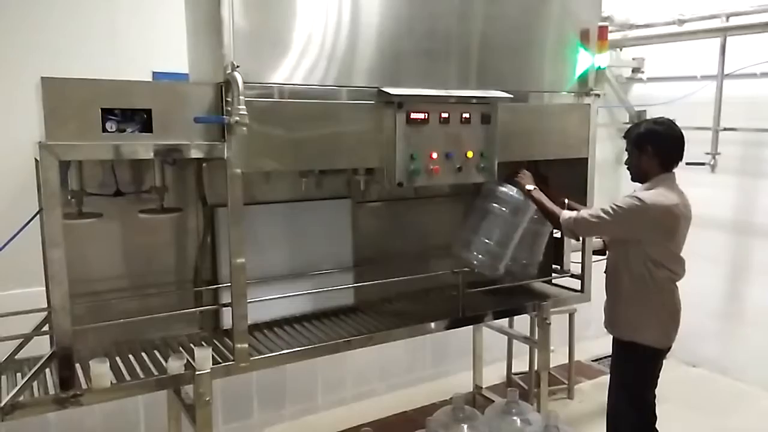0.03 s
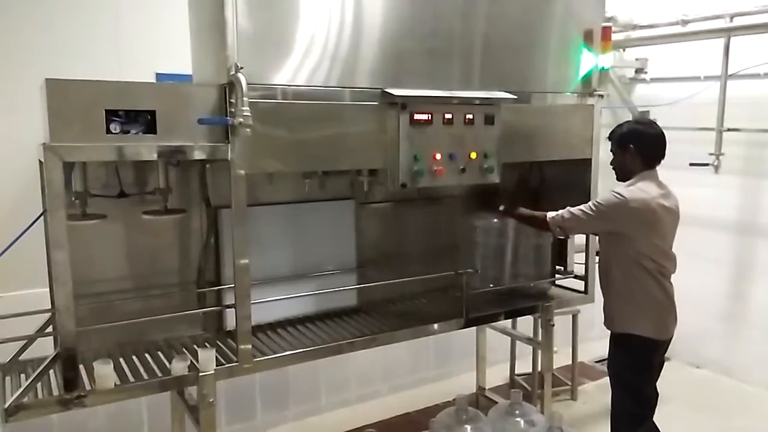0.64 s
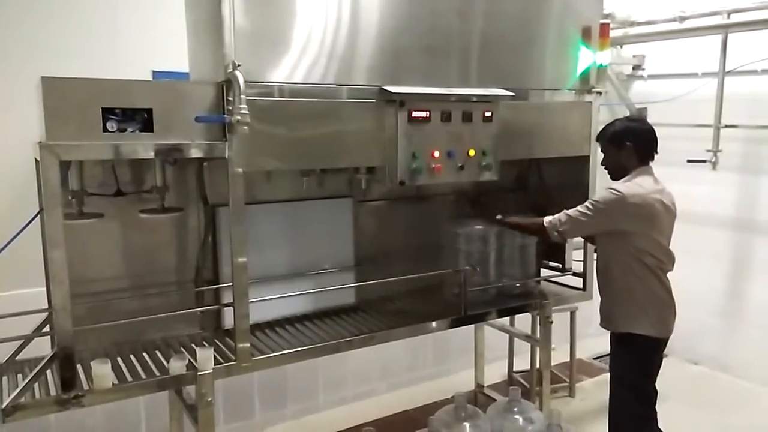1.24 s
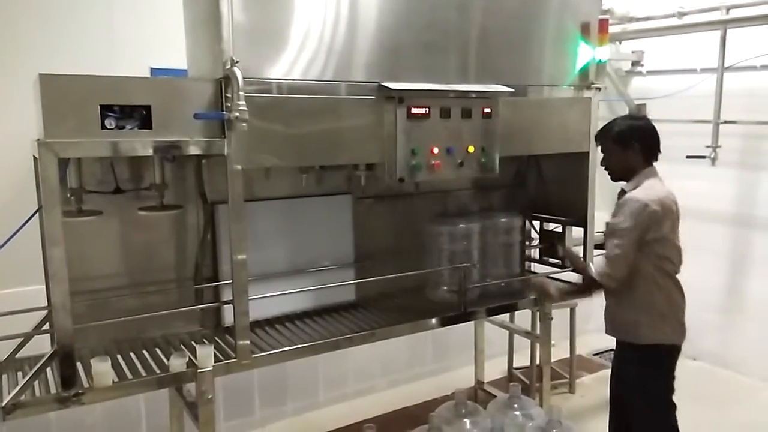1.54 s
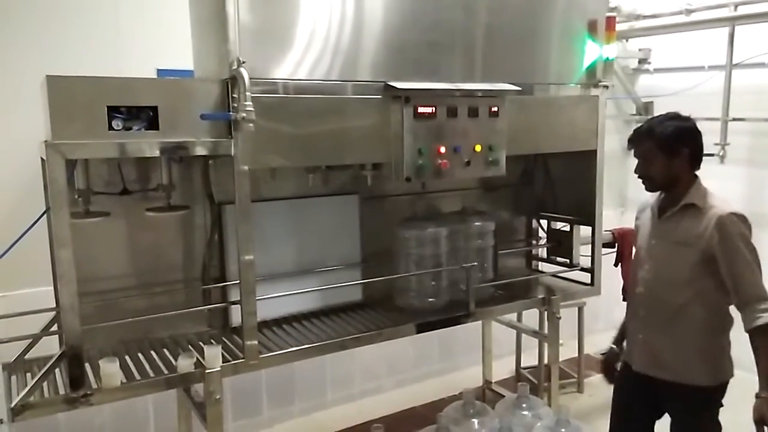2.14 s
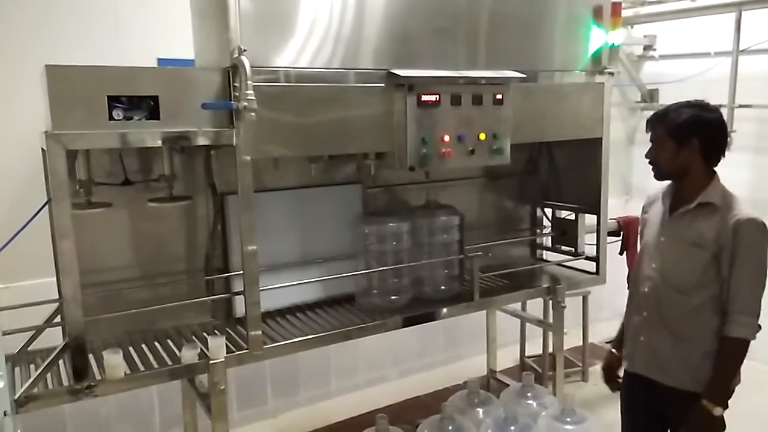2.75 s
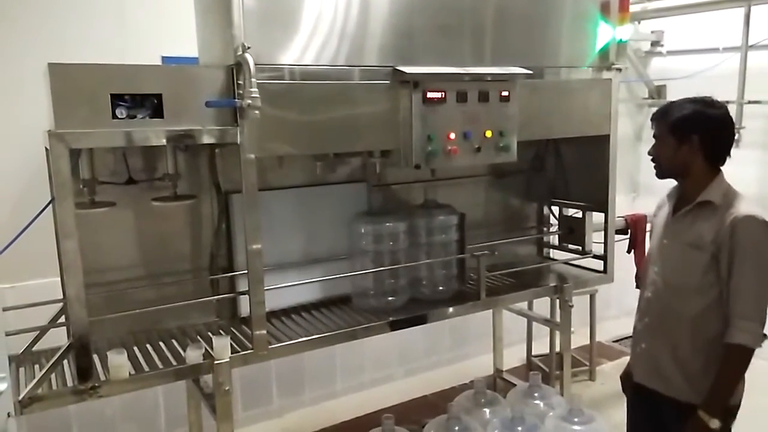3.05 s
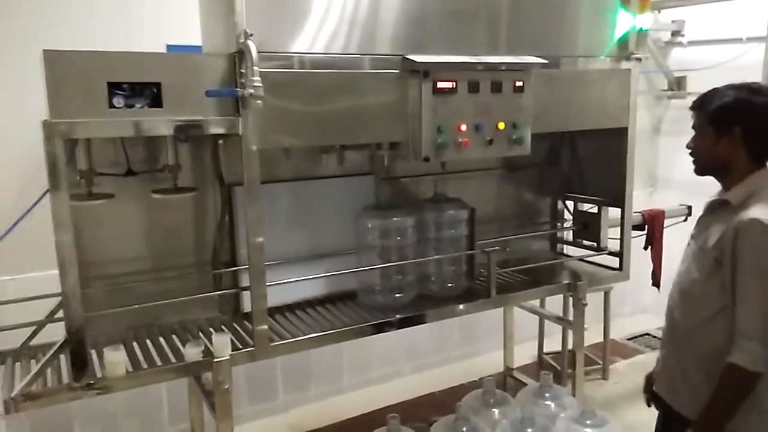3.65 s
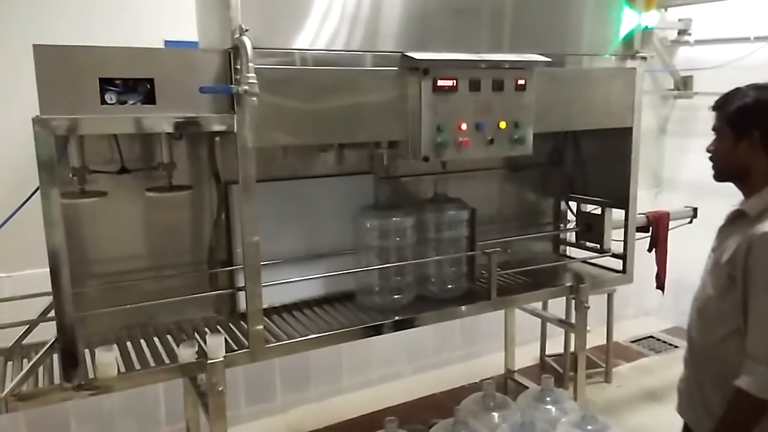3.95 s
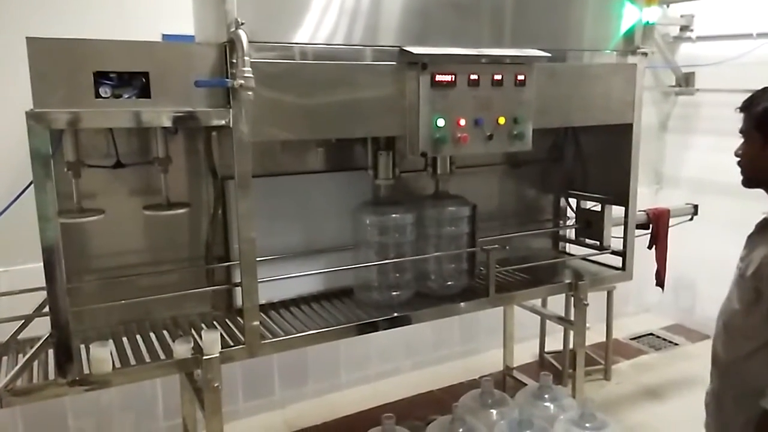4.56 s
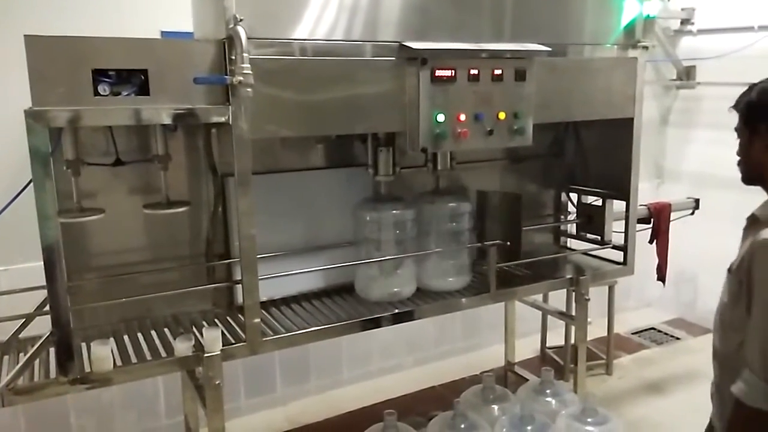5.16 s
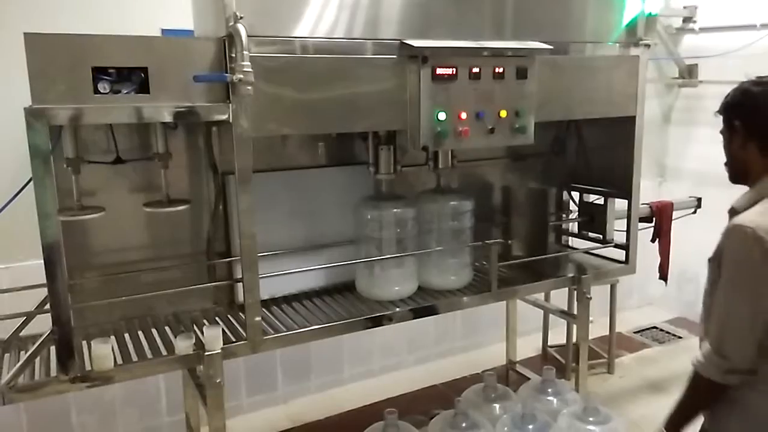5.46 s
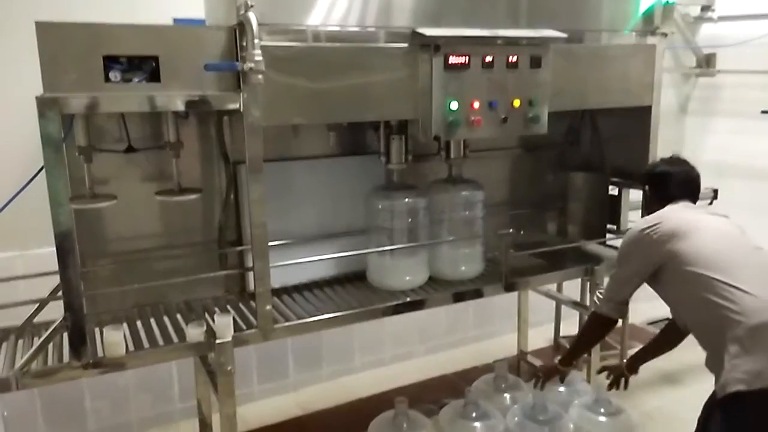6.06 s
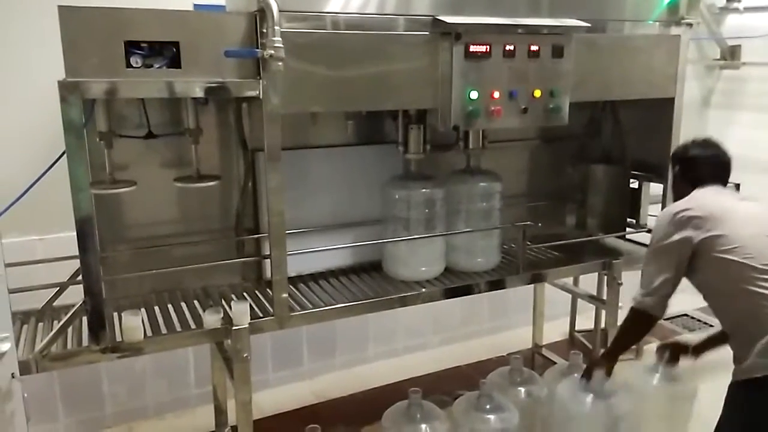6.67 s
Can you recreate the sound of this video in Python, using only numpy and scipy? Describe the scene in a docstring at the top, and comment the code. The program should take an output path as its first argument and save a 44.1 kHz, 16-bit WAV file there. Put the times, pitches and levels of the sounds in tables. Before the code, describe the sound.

A jar-filling machine sprays water and hisses over rumbling plastic jars, then a valve blasts, steel clangs and the spraying resumes.

```python
"""A steel jar-filling machine in a hard-walled factory room. After a moment of silence a motor hums and
empty plastic jars knock and rumble over rollers. Water sprays and compressed air hisses, then both ease
off while the jars shuffle on. Just after 4 s a valve blows off and the filling heads clamp down with a
clang; water sprays into the jars under fresh hiss, and a second valve spits. A faint rush lingers as the
jars knock onward. Throughout, the microphone ports ring in the top treble."""
import sys
import numpy as np
from scipy import signal
from scipy.fft import rfft, irfft, next_fast_len
from scipy.io import wavfile

SR = 44100
rng = np.random.default_rng(int(sys.argv[2]) if len(sys.argv) > 2 else 0)


def output_pcm(signal):
    """Save a mono or channel-first signal as 16-bit PCM at the path in sys.argv[1].

    Samples are clipped to [-1, 1] before scaling.
    """
    pcm = np.clip(np.atleast_2d(signal).T, -1, 1) * 32767
    wavfile.write(sys.argv[1], SR, np.round(pcm).astype(np.int16))


N = 305613
TIME = np.arange(N) / SR

# Reverb time of the hard walls: frequency_hz, t60_s
ROOM_T60 = [(100, 2), (1000, 1.5), (4000, 0.95), (10000, 0.92)]
# Stereo width, narrow in the bass: frequency_hz, side_minus_mid_db
STEREO_WIDTH = [(60, -25), (170, -17.5), (350, -11.5), (700, -5.5), (1300, -0.5), (14000, 0)]

# EQ curves that give each noise its tone: frequency_hz, relative_level_db
PLANT_EQ = [(30, 3), (60, 1), (100, 0.5), (200, -4), (320, 1.5), (600, -3), (1000, -13), (2000, -24.5),
            (4000, -45), (12000, -59)]  # low murmur
ROLLER_EQ = [(30, -12), (45, -7), (85, 5.5), (160, -2.5), (230, 3), (320, -3.5), (420, -5), (620, -8),
             (900, -13), (2000, -24), (4000, -34), (12000, -90)]  # dark rumble
AIR_EQ = [(3500, -14.5), (5000, -18), (6200, -2.5), (8000, 2.5), (10000, 1.5), (12000, -0.5), (14000, -3.5)]  # thin hiss
WATER_EQ = [(100, -33), (300, 5), (650, 6), (1000, 4), (1600, 2), (2300, 5), (3400, 2), (5000, 3.5),
            (7000, -1.5), (10000, -30), (14000, -26.5)]  # full midrange rush
BLOW_OFF_EQ = [(30, -16), (60, 6), (170, 6.5), (400, 2.5), (800, 0.5), (1300, 2.5), (1600, 1), (2100, 3),
               (3400, 2), (4800, 2.5), (7000, 2), (8400, 1.5), (10000, 0.5), (12500, -1.5), (14000, -3)]  # broad blast
SPIT_EQ = [(1000, -12.5), (3600, -8.5), (4100, 1), (4900, 5.5), (6100, -4), (7000, -8), (8500, -6),
           (10200, -3.5), (12000, -14), (14000, -10)]  # sharp treble bite
JAR_RATTLE_EQ = [(30, -32), (50, -15), (90, 17.5), (160, 2), (230, -4), (520, 3.5), (800, 1), (1300, 3.5),
                 (1650, -5), (2100, 5.5), (2500, 5), (2900, -4), (4000, -3), (12000, -9.5)]  # thump and plastic clatter
CLAMP_RATTLE_EQ = [(30, -37), (55, 0), (100, 6.5), (200, 3), (340, 2), (480, -1), (780, 7), (1050, 1.5),
                   (1600, -5), (3000, -8.5), (4000, -15.5), (10000, -9)]  # heavy clank

# The conveyor drive hums in the frame, its tones changing with the load:
# start_s, length_s, pitch_hz, level_db
MOTOR_TONES = [(.58, 5.7, 87, -69.5), (.58, 2.9, 290, -69), (.58, 2.5, 326, -66), (3.9, 3.0, 331, -66),
               (1.62, .68, 457, -61.5), (3.08, .39, 583, -64)]
# Jars are shoved along the rollers, then coast: start_s, length_s, level_db
JAR_SHOVES = [(.52, 0.24, -37.5), (.87, 0.044, -37.5), (1.38, 0.1, -42), (1.59, 0.029, -41.5),
              (2.2, 0.67, -51.5), (3.95, 0.63, -52), (5.1, 0.22, -52.5), (5.8, 0.76, -53)]
# The hollow jars colour their own rumble: centre_hz, width_hz, boost_db
JAR_HOLLOWS = [(175, 30, 1), (320, 28, 3), (465, 28, 3), (600, 40, 3)]
# Jars, rails and heads slide on each other:
# start_s, length_s, centre_hz, width_hz, level_db, glide_octaves_per_s
RUBS = [(0.573, 0.11, 85.4, 21.8, -46, 0), (1.593, 0.35, 155, 60, -51, 0),
        (2.302, 0.25, 567, 304, -59.5, 0), (2.62, 0.19, 800, 790, -58, -0.5),
        (2.839, 0.21, 840, 300, -62, -1), (3.531, .11, 1510, 109, -70, -0.5),
        (4.359, 0.085, 556, 160, -40.5, 0), (4.397, 0.16, 346, 80, -37.5, -0.2),
        (6.01, 0.25, 161, 22, -51, 1.5), (6.06, 0.14, 2500, 800, -47.5, -2),
        (6.048, 0.39, 770, 200, -57.5, 0.5), (6.723, 0.214, 776, 160, -59, -0.2)]
# Jar walls flex as they drop over rollers or are grabbed: start_s, pitch_hz, level_db
JAR_BONKS = [(.583, 300, -36), (.6, 84, -32), (.64, 160, -31), (.69, 84, -30.5), (.712, 330, -35),
             (.72, 165, -34), (.852, 590, -32.5), (.854, 1250, -38), (.858, 305, -35), (.885, 490, -35),
             (.915, 132, -30), (.97, 300, -37), (1.12, 390, -42), (1.205, 130, -41), (1.611, 145, -37),
             (1.705, 138, -37.5), (1.755, 150, -37), (1.886, 105, -37), (1.97, 170, -41.5),
             (2.065, 188, -47), (2.151, 190, -47), (2.255, 225, -47), (2.41, 315, -49), (2.495, 455, -49),
             (2.522, 565, -46), (2.669, 310, -44), (2.72, 310, -45), (2.772, 160, -40), (3.11, 570, -52),
             (3.435, 298, -47), (3.675, 330, -55), (3.735, 385, -52), (3.9, 86, -44), (4.105, 410, -49),
             (5.85, 92, -48), (5.94, 86, -46), (5.975, 258, -47), (6.046, 275, -45), (6.052, 860, -48),
             (6.21, 295, -47), (6.285, 595, -45.5), (6.34, 490, -43.5), (6.335, 275, -46),
             (6.435, 295, -45), (6.6, 310, -49), (6.78, 312, -50), (6.9, 590, -50)]
# Jars knock on rails and on each other: start_s, level_db, brightness_hz
JAR_KNOCKS = [(.64, -7.5, 1500), (.715, -20, 900), (.851, -4, 4530), (.92, -11, 1500), (1.66, -5.5, 710),
              (6.055, -16.5, 1100), (6.29, -19, 1400), (6.345, -27, 1400), (6.443, -25, 1205),
              (6.604, -21, 1210)]
# Ring of a hollow plastic jar: pitch_hz, level_db, t60_s
JAR_MODES = [(135, 13, 0.26), (318, 17, 0.35), (474, 14, 0.25), (590, 14, 0.15), (1090, 6, .25),
             (1330, 12, 0.22), (1930, 4, .12), (2170, 3, .12), (2470, 4, .12), (3580, 1, .12)]

# The air line is held open: start_s, length_s, level_db
AIR_JETS = [(.93, 1.964, -43), (4.55, 1.556, -41)]
# Short soft puffs of air: start_s, length_s, level_db
AIR_PUFFS = [(.58, 0.082, -56.5), (.84, 0.028, -44), (3.06, 0.079, -56.5), (3.26, 0.07, -49),
             (3.48, 0.12, -60.5), (3.72, 0.1, -52.5), (6.38, 0.056, -59), (6.64, 0.1, -50.5)]
# The water valves are open: start_s, length_s, level_db
WATER_JETS = [(.58, 0.2, -49), (.85, 1.047, -40), (4.6, 1.586, -39.5)]
# A faint midrange rush, under the air jet and after the last spray: start_s, length_s, level_db
SOFT_RUSHES = [(1.9, 1.0, -60), (6.12, .9, -60.5)]
# Whistles in the exhaust port: pitch_hz, level_db
EXHAUST_WHISTLES = [(3143, -24), (4194, -24), (4720, -22.5), (6476, -23), (8186, -27), (8620, -22)]
# The filling heads meet their stops: start_s, level_db, brightness_hz
HEAD_CLAMPS = [(4.372, -5.5, 400), (4.434, -3, 417), (4.509, -1.5, 605), (4.534, 0.5, 5700),
               (4.552, -2, 3500), (4.582, -10.5, 2000)]
# Ring of the steel frame: pitch_hz, level_db, t60_s
STEEL_MODES = [(103.1, -2, 0.48), (152.8, 0, 0.75), (214.6, -2, 0.89), (264.8, 4, 0.56), (339.3, 4.5, 0.53),
               (429.3, -6, 0.62), (483, -6.5, 0.47), (575, -5, 0.58), (749, 11.5, 0.14), (827, -10, 0.5),
               (974.4, 5, 0.72), (1022, 4, 0.65), (1086, -4, .35), (1200, -10, 0.61), (1387, -7, 0.24),
               (1920, -3, 0.31), (2317, -4.5, 0.45), (3010, -2, 0.36)]


def undb(db):
    """Decibels to gain."""
    return 10 ** (np.asarray(db) / 20)


def unit(x):
    """Scale to rms 1."""
    return x / np.sqrt(np.mean(x ** 2))


def curve_at(points, hz):
    """Read (frequency_hz, value) points on a log-frequency axis."""
    point_hz, value = np.transpose(points)
    return np.interp(np.log(hz + 1), np.log(point_hz), value)


def filtered(x, response):
    """Apply a frequency response, given as a function of Hz."""
    size = next_fast_len(x.shape[-1] + 4096)
    spectrum = rfft(x, size) * response(np.fft.rfftfreq(size, 1 / SR))
    return irfft(spectrum, size)[..., :x.shape[-1]]


def colour(x, eq):
    """Shape x with an EQ curve, at rms 1."""
    return unit(filtered(x, lambda hz: undb(curve_at(eq, hz))))


def resonance(hz, centre_hz, width_hz):
    """Response of one damped resonance, 1 at its centre."""
    return 1j * hz * width_hz / (centre_hz ** 2 - hz ** 2 + 1j * hz * width_hz)


def diffuse(pair):
    """Two unrelated signals become sound from all sides: centred in the bass, wide in the treble."""
    mid = pair[0]
    side = filtered(pair[1], lambda hz: undb(curve_at(STEREO_WIDTH, hz)))
    return np.array([mid + side, mid - side])


def noise(size=N):
    """Diffuse white noise, left and right."""
    return diffuse(rng.standard_normal((2, size)))


def clicks(per_s, size):
    """Two unrelated streams of randomly timed clicks of either polarity."""
    return (rng.random((2, size)) < per_s / SR) * rng.choice([-1, 1], (2, size))


def drift(rate_hz):
    """A random modulator at rms 1, gliding to a new value rate_hz times a second."""
    return unit(np.interp(TIME * rate_hz, np.arange(2000), rng.standard_normal(2000)))


def tones(partials, waver_hz, flutter_db):
    """Sines from (pitch_hz, level_db) rows, wandering in pitch and level."""
    out = 0
    for hz, db in partials:
        phase = 2 * np.pi * np.cumsum(hz + waver_hz * drift(25)) / SR
        flutter = undb(flutter_db * drift(5.32))
        out = out + undb(db) * unit(flutter * np.sin(phase))
    return out


def swells(rows, rise_s, release_db_per_s, sag_db_per_s=0, surge_db=0, surge_s=0.071):
    """Envelope from (start_s, length_s, level_db) rows: each rises, holds and dies away; powers add."""
    power = 0
    for start_s, length_s, db in rows:
        age = np.maximum(TIME - start_s, 0)
        attack = 1 - np.exp(-age / rise_s)
        held_db = db + surge_db * np.exp(-age / surge_s) - sag_db_per_s * age
        release_db = release_db_per_s * np.maximum(age - length_s, 0)
        power = power + (attack * undb(held_db - release_db)) ** 2
    return np.sqrt(power)


def vent(start_s, rise_s, fall_s, open_s):
    """Envelope of the flow through a valve: it opens, the pressure drains, it shuts."""
    age = np.maximum(TIME - start_s, 0)
    opening = 1 - np.exp(-age / rise_s)
    shutting = np.clip((open_s - age) / rise_s, 0, 1)
    return opening * np.exp(-age / fall_s) * shutting


def panel_ring(modes, spread):
    """Thin panels ring in dense clusters of close partials that beat against each other."""
    out, t = 0, TIME[:SR]
    for hz, db, t60_s in modes:
        cluster = filtered(rng.standard_normal(SR), lambda f: resonance(f, hz, spread * hz) ** 2)
        out = out + unit(cluster) * undb(db - 60 * t / t60_s)
    return out / np.sqrt(2)


def hits(rows, rattle_eq, modes, rattle_s, ring_db, spread):
    """Each hit is a short rattle plus the body's ring; softer contact takes off the treble."""
    out, t = np.zeros((2, N + SR)), TIME[:SR]
    body = undb(ring_db) * diffuse([panel_ring(modes, spread) for _ in range(2)])
    for start_s, db, brightness_hz in rows:
        rattle = colour(noise(SR), rattle_eq) * np.exp(-t / rattle_s)
        contact = signal.butter(2, brightness_hz, fs=SR, output="sos")
        i = int(start_s * SR)
        out[:, i:i + SR] += undb(db) * signal.sosfilt(contact, rattle + body)
    return out[:, :N]


def room(x, direct_db):
    """The direct sound and a dense tail from the hard walls, dying sooner in the treble."""
    wash, tail, t = noise(SR), 0, TIME[:SR]
    centres_hz, t60s = np.transpose(ROOM_T60)
    for weights, t60_s in zip(np.eye(len(t60s)), t60s):
        band = list(zip(centres_hz, weights))  # crossfades into its neighbours
        tail = tail + filtered(wash, lambda hz: curve_at(band, hz)) * undb(-60 * t / t60_s)
    tail = unit(tail) / np.sqrt(SR)
    reverb = signal.fftconvolve(np.broadcast_to(x, (2, N)), tail, axes=1)[:, :N]
    return undb(direct_db) * x + reverb


def plant_murmur():
    """The rest of the plant: a low, gently wavering bed of noise."""
    return colour(noise(), PLANT_EQ) * undb(-59.5 + drift(3.67))


def motor():
    """The conveyor motor hums unevenly, its tones coming and going with the load."""
    hum = 0
    for start_s, length_s, hz, db in MOTOR_TONES:
        load = swells([(start_s, length_s, db)], rise_s=0.016, release_db_per_s=110)
        hum = hum + load * tones([(hz, 0)], waver_hz=6, flutter_db=3)
    return hum


def rollers(bumps_per_s=70, scatter_db=1.5, idle_db=-64.5):
    """Uneven bumps on the rollers ring the hollow jars and blur in the room; each shove coasts out."""
    def jar_response(f):
        return 1 + sum(undb(db) * resonance(f, hz, width_hz) for hz, width_hz, db in JAR_HOLLOWS)

    bumps = clicks(bumps_per_s, N) * undb(scatter_db * rng.standard_normal((2, N)))
    hollow = filtered(diffuse(bumps), jar_response)
    rumble = colour(room(hollow, direct_db=-2.5), ROLLER_EQ)
    shoves = swells(JAR_SHOVES, rise_s=0.058, release_db_per_s=25)
    return rumble * np.hypot(shoves, undb(idle_db))


def rubs(slips_per_s=1200):
    """Quick uneven slips excite one resonance of a sliding part; it swells, may glide, and fades."""
    out, t = np.zeros((2, N + SR)), TIME[:SR]
    for start_s, length_s, hz, width_hz, db, glide in RUBS:
        slips = diffuse(clicks(slips_per_s, SR))
        body = unit(filtered(slips, lambda f: resonance(f, hz, width_hz) ** 2))
        speed = 2 ** (glide * (np.minimum(t, length_s) - length_s / 2))  # varispeed bends the pitch
        playhead_s = np.cumsum(speed) / SR
        gliding = np.array([np.interp(playhead_s, t, side) for side in body])
        swell = np.sin(np.pi * np.clip(t / length_s, 0, 1))
        i = int(start_s * SR)
        out[:, i:i + SR] += undb(db) * swell * gliding
    return room(out[:, :N], direct_db=2.5)


def jar_bonks(rise_s=0.004, decay_s=0.022, sharp_share=0.08, overtone_ratio=2.5, overtone_db=-9):
    """A jar wall dents and springs back: a short hollow note that starts sharp and settles."""
    out, t = np.zeros(N + SR), TIME[:SR]
    decay = np.exp(-t / decay_s)
    envelope = (1 - np.exp(-t / rise_s)) * decay
    for start_s, hz, db in JAR_BONKS:
        pitch_hz = hz * (1 + sharp_share * decay)
        phase = 2 * np.pi * (rng.random() + np.cumsum(pitch_hz) / SR)
        overtone = undb(overtone_db) * envelope * np.sin(overtone_ratio * phase)
        i = int(start_s * SR)
        out[i:i + SR] += undb(db) * envelope * (np.sin(phase) + overtone)
    return room(out[:N], direct_db=4.5)


def jar_knocks():
    """Hollow plastic jars knock dully on the rails and on each other."""
    knocks = hits(JAR_KNOCKS, JAR_RATTLE_EQ, JAR_MODES, rattle_s=0.071, ring_db=-24, spread=0.078)
    return room(knocks * undb(-30.5), direct_db=3)


def air_hiss(flutter_db=0.58, leak_db=-60.5):
    """Air through a narrow gap makes a smooth, bright hiss: long jets and puffs over a steady leak."""
    # Stored pressure makes each jet start with a surge.
    jets = swells(AIR_JETS, rise_s=0.023, release_db_per_s=69, sag_db_per_s=1, surge_db=9.5)
    puffs = swells(AIR_PUFFS, rise_s=0.033, release_db_per_s=69)
    flow = np.sqrt(jets ** 2 + puffs ** 2 + undb(leak_db) ** 2)
    return colour(noise(), AIR_EQ) * flow * undb(flutter_db * drift(22))


def water_spray(splash_db=1.22, floor_db=-68.5):
    """Water jets drum on plastic and steel, roughened by splashes; a faint rush shares their tone."""
    splashes = undb(splash_db * np.array([drift(160), drift(160)]))
    jets = swells(WATER_JETS, rise_s=0.00039, release_db_per_s=85, sag_db_per_s=3.5)
    rushes = swells(SOFT_RUSHES, rise_s=0.045, release_db_per_s=83)
    envelope = np.sqrt(jets ** 2 + rushes ** 2 + undb(floor_db) ** 2)
    return colour(noise() * splashes, WATER_EQ) * envelope


def valve_spit():
    """A small valve lets out one sharp spit, a little to the left."""
    flow = vent(start_s=5.409, rise_s=0.002, fall_s=0.031, open_s=0.15)
    spit = colour(noise(), SPIT_EQ) * flow * undb([[-20.5], [-24]])
    return room(spit, direct_db=-2.5)


def valve_blow_off():
    """A valve cracks open, then blows off in a broad blast with faint whistles from its exhaust port."""
    crack_flow = vent(start_s=4.149, rise_s=0.002, fall_s=0.03, open_s=0.03)
    blast_flow = vent(start_s=4.16, rise_s=0.008, fall_s=0.27, open_s=0.43)
    whistles = tones(EXHAUST_WHISTLES, waver_hz=9, flutter_db=1.5)
    crack = colour(noise(), AIR_EQ) * crack_flow * undb(-33)
    blast = (colour(noise(), BLOW_OFF_EQ) + whistles) * blast_flow * undb(-25.5)
    return room(crack + blast, direct_db=-0.5)


def head_clang():
    """The filling heads hit their stops in quick succession and set the steel frame ringing."""
    clang = hits(HEAD_CLAMPS, CLAMP_RATTLE_EQ, STEEL_MODES, rattle_s=0.028, ring_db=-18.5, spread=0.038)
    return room(clang * undb([[-21.5], [-20.5]]), direct_db=3)


def scene():
    """The stereo mix: the factory bed, the moving jars, then the filler up front."""
    bed = plant_murmur() + motor()
    jars = rollers() + rubs() + jar_bonks() + jar_knocks()
    filler = air_hiss() + water_spray() + valve_spit() + valve_blow_off() + head_clang()
    return bed + jars + filler


def mic_port(x, centre_hz, width_hz, boost_db):
    """The small cavity in front of a microphone rings in the top treble."""
    return filtered(x, lambda hz: 1 + undb(boost_db) * resonance(hz, centre_hz, width_hz))


def record(dry):
    """Two ported microphones switch on after a moment of silence; deep bass and top treble are cut."""
    switch_on_s, low_cut_hz, high_cut_hz = 0.58, 38, 14250
    left = mic_port(dry[0], centre_hz=10140, width_hz=1296, boost_db=15.0)
    right = mic_port(dry[1], centre_hz=9940, width_hz=1930, boost_db=4.5)
    live = np.array([left, right]) * (TIME > switch_on_s)
    low_cut = signal.butter(6, low_cut_hz, "high", fs=SR, output="sos")
    high_cut = signal.ellip(12, 0.2, 80, high_cut_hz, fs=SR, output="sos")
    return signal.sosfilt(high_cut, signal.sosfilt(low_cut, live))


dry = scene()
out = record(dry)
output_pcm(out)
```